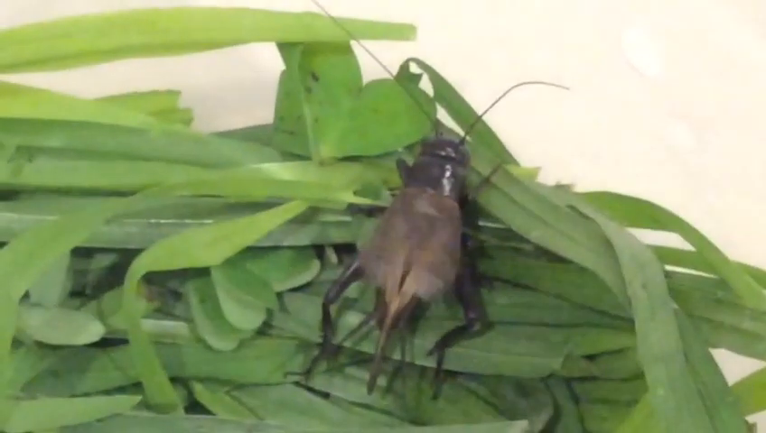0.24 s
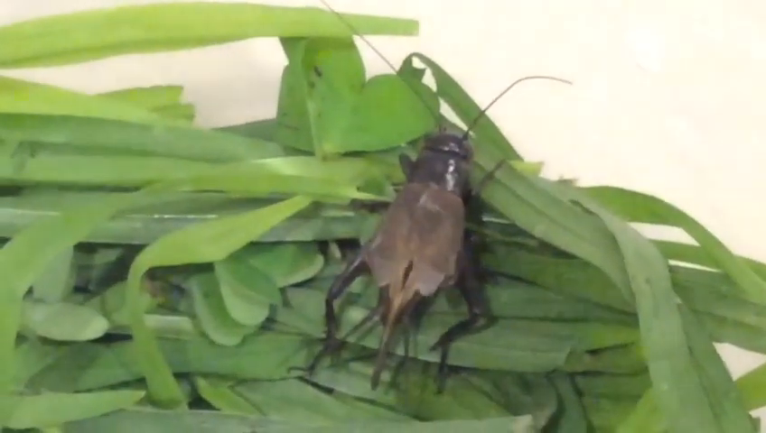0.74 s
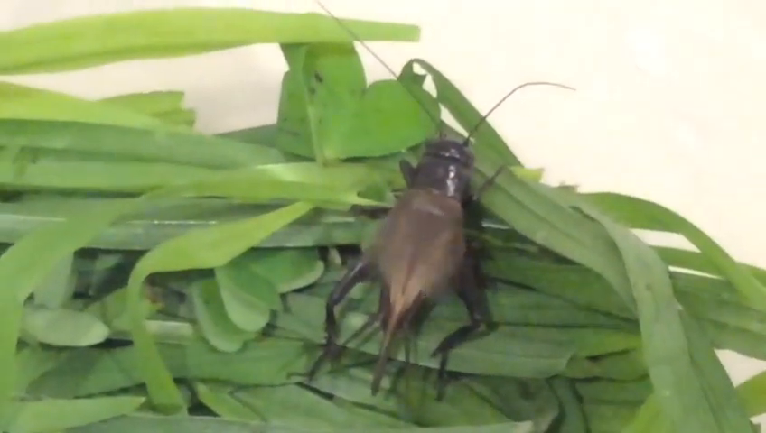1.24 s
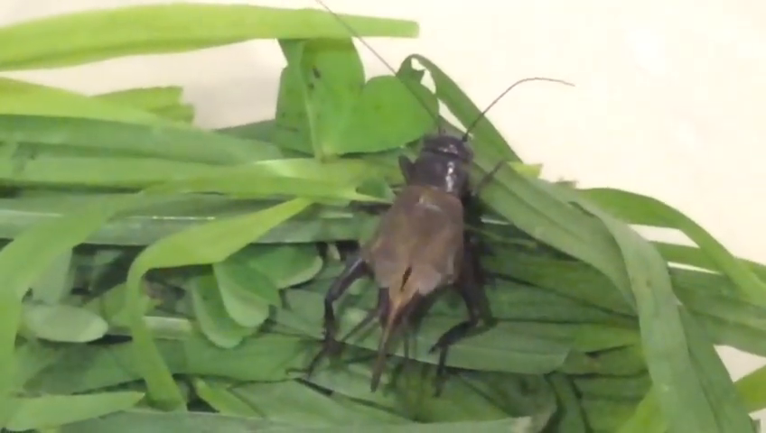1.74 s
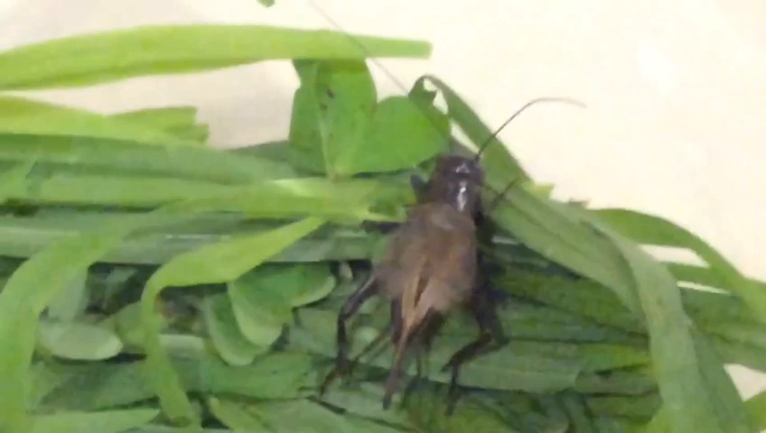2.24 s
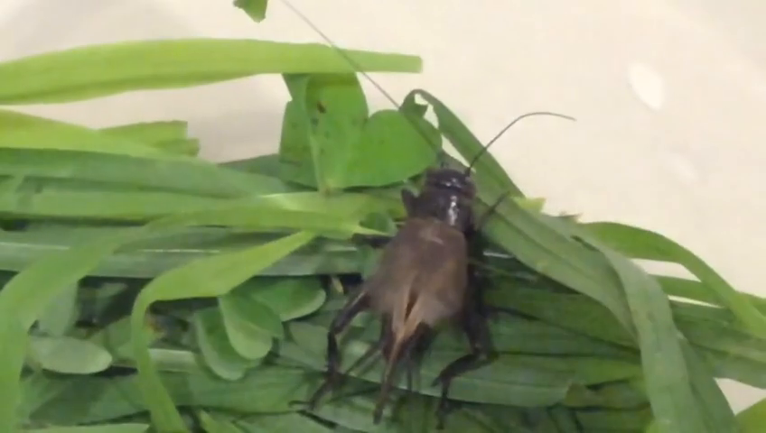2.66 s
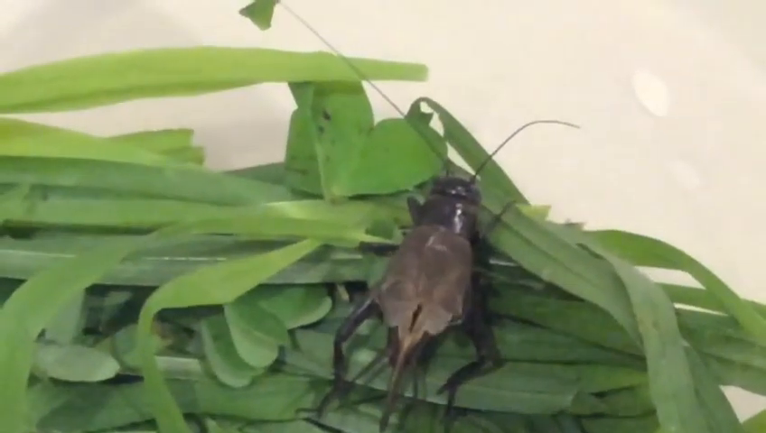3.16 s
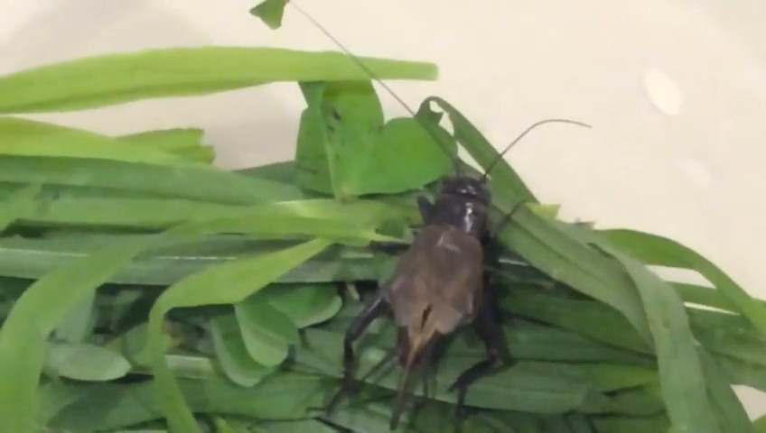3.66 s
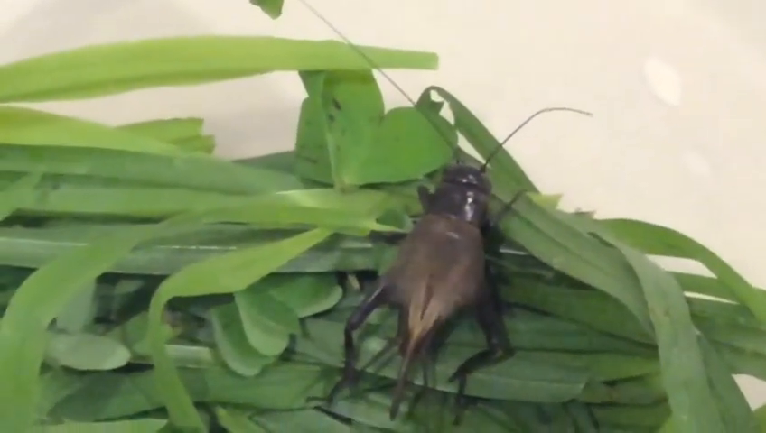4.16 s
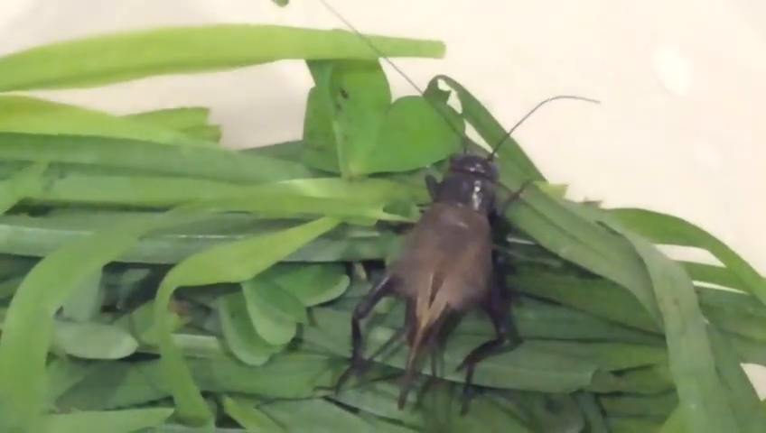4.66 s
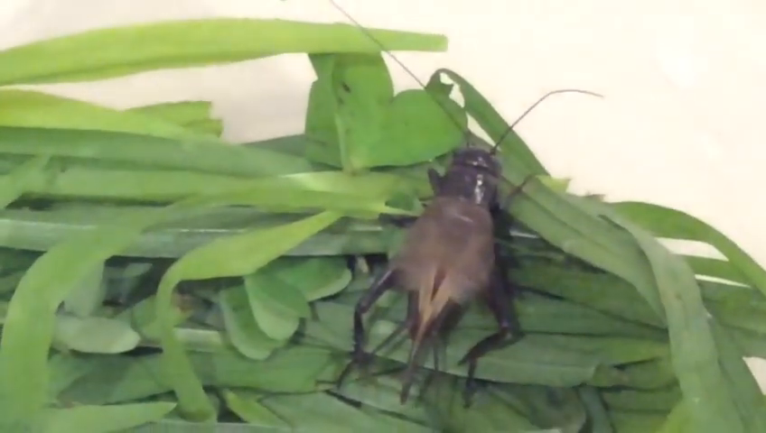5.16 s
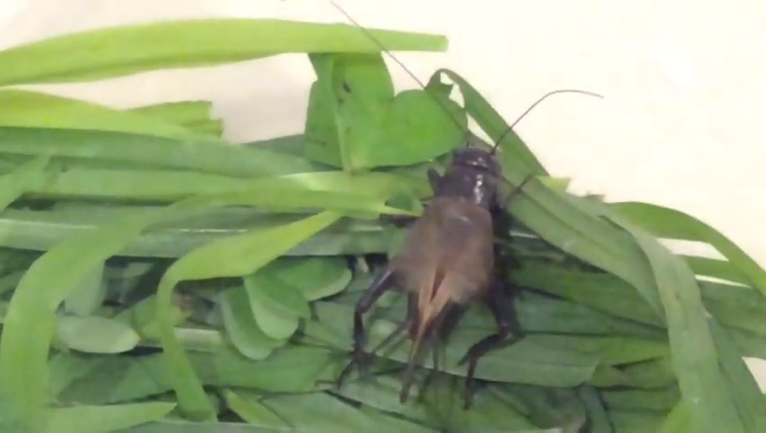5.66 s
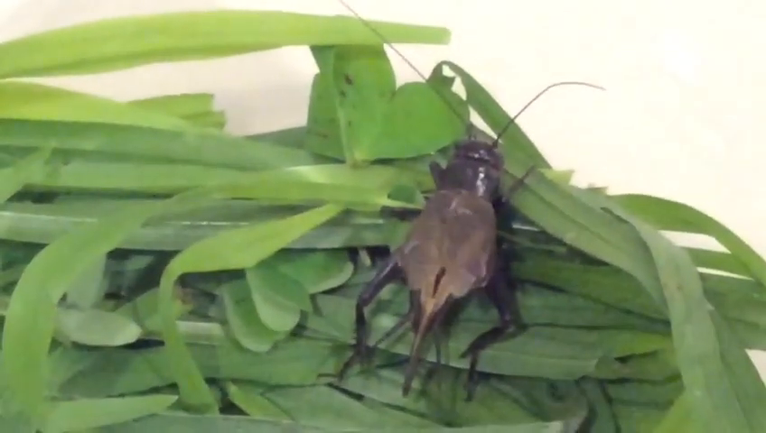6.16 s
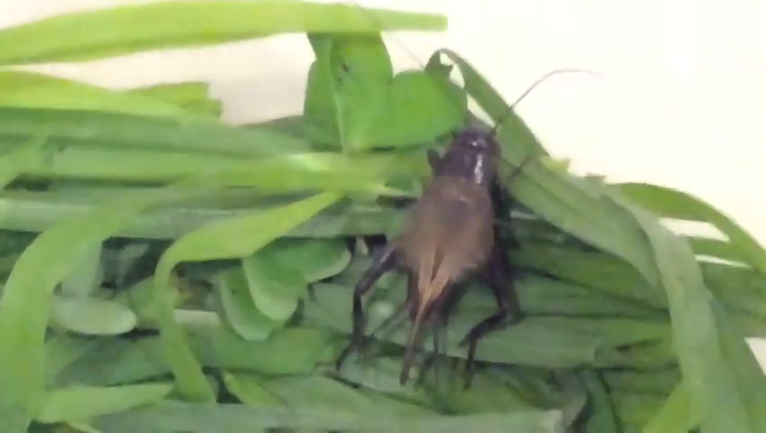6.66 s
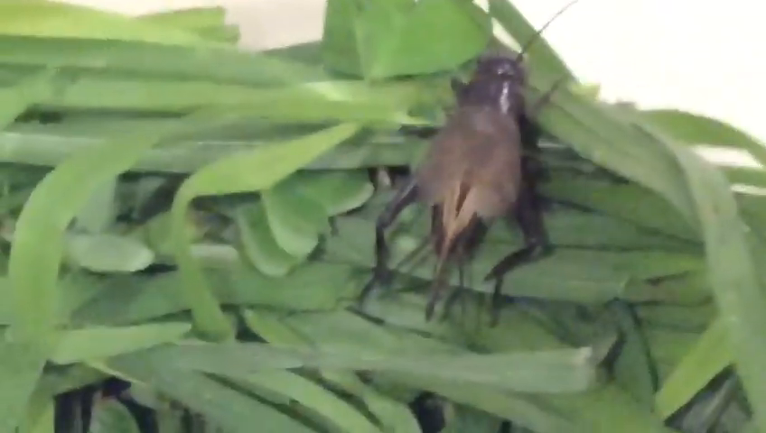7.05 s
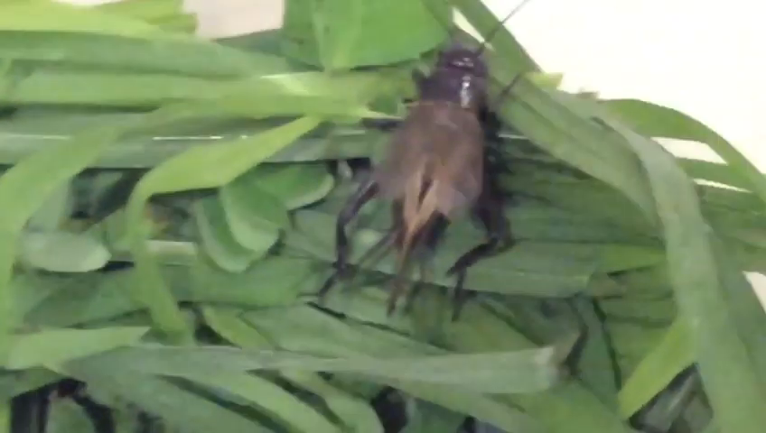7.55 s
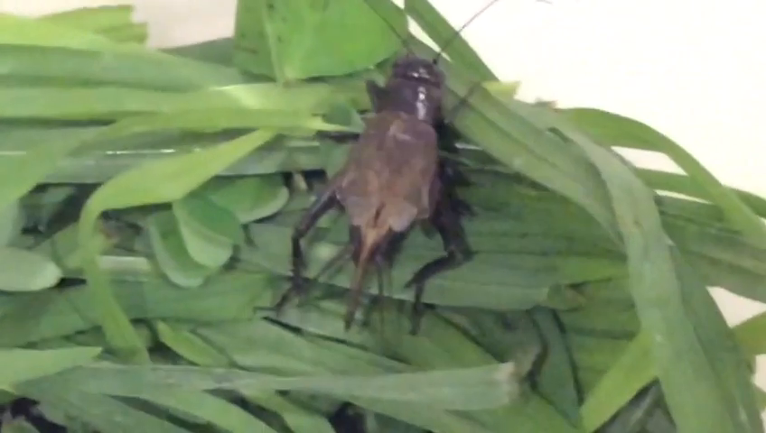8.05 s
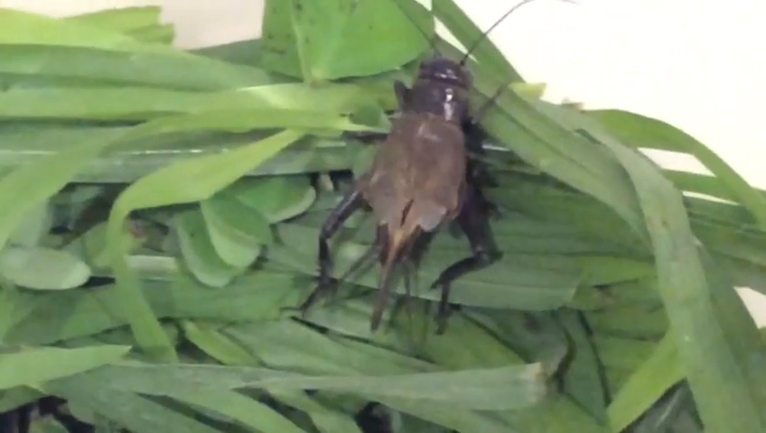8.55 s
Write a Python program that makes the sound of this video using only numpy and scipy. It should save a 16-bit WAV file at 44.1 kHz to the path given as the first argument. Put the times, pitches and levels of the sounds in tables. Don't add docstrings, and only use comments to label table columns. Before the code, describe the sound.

A single cricket sings at close range in a quiet room. Rapid, clear, high pulses, each with a slight downward sag and a trace of dry rasp, gather into short trills separated by brief gaps. A faint low hum and a short room tail sit behind. Around seven seconds the hand-held microphone moves in, the chirping gets louder, and soft bumps and a low creak of the grip are heard.

```python
import sys
import numpy as np
from scipy import signal
from scipy.fft import rfft, irfft
from scipy.io import wavfile

SR = 44100
rng = np.random.default_rng(int(sys.argv[2]) if len(sys.argv) > 2 else 0)


def to_linear_factor(level_db):
    exponent = np.asarray(level_db, float) / 20
    return 10 ** exponent


def dump(signal):
    limited = np.clip(np.atleast_2d(signal).T, -1, 1)
    pcm = np.round(limited * 32767).astype(np.int16)
    wavfile.write(sys.argv[1], SR, pcm)


N = 388521

# pitch_hz, width_hz, level_db
WING_MODES = [(3400, 760, -4.5), (3450.4, 77, 6)]
# time_s, level_db
UPPER_LEVEL = [(0, -7), (1.3, 11.5), (4.3, 14), (6.7, 9), (7.2, -18)]
# pitch_hz, level_db
OVERTONE_RADIATION = [(6000, -42), (6700, -4), (7300, -4), (7700, -21), (9600, -31), (10300, -17),
                      (11000, -10), (11500, 6)]
# pitch_hz, level_db_per_hz
RASP_COLOUR = [(900, -45), (1500, -18), (2500, -11.5), (3400, 17), (3800, -2.5), (4250, 7.5), (4900, -3.5),
               (5900, -11.5), (7200, -8), (9500, -13.5), (11000, -16), (12300, -9)]
# start_s, click_peak_db, settled_tooth_rate_hz, grit_db
TRILL_STARTS = [(-.25, -60, 3530, 0), (0.2578, -56, 3460, 0), (0.807, -54.5, 3555, -1),
                (1.926, -54, 3520, 0), (2.597, -49.5, 3540, 0), (3.246, -53.5, 3520, -1),
                (3.8627, -52.5, 3545, 1), (4.9651, -51, 3530, 0), (5.6475, -48, 3540, 0),
                (6.308, -52.5, 3560, 3), (7.0554, -57, 3545, 0), (8.222, -53, 3500, .5)]
# first_s, last_s, count, length_ms, settled_peak_db
WIDE_STROKES = [(.2744, .2744, 1, 26, -19), (.327, .327, 1, 26.5, -22.5), (.394, .394, 1, 27, -21.5),
                (.455, .512, 2, 26, -19.5), (.5737, .5737, 1, 20, -25), (.8241, .897, 2, 30, -18),
                (.972, 1.425, 7, 37, -19.5), (3.8877, 3.8877, 1, 21.8, -23), (3.958, 3.958, 1, 29, -18),
                (4.0315, 4.255, 4, 36, -21), (4.3343, 4.4758, 3, 34.5, -22), (6.604, 6.706, 3, 24.2, -17.5),
                (6.7695, 6.7695, 1, 25.8, -16), (7.0729, 7.0729, 1, 29.5, -14.5),
                (7.1466, 7.1466, 1, 30.5, -12), (7.2273, 7.2273, 1, 30.6, -12.2),
                (7.2998, 7.2998, 1, 37, -14), (7.3821, 7.528, 3, 28.4, -15.5), (7.602, 7.6796, 2, 32, -15)]
# first_s, last_s, count, length_ms, settled_peak_db
NARROW_STROKES = [(-.23, -.14, 3, 25, -24), (1.4876, 1.6692, 5, 24.6, -19.5),
                  (1.9418, 2.0775, 4, 24.5, -20.5), (2.1175, 2.2504, 4, 25, -21),
                  (2.3052, 2.3052, 1, 24.4, -20.5), (2.6125, 2.658, 2, 23, -24.5),
                  (2.7024, 2.927, 6, 24.5, -21.3), (3.2632, 3.538, 7, 24.3, -22),
                  (4.5448, 4.7634, 6, 23.5, -21), (4.982, 5.342, 9, 24.4, -21.5),
                  (5.662, 5.8025, 4, 25.4, -21.5), (5.845, 5.979, 4, 23.7, -20.3),
                  (6.0263, 6.0263, 1, 15.2, -26), (6.328, 6.553, 6, 22, -20.5),
                  (7.7495, 7.84, 3, 22.5, -14), (8.2373, 8.2373, 1, 26.5, -18.5),
                  (8.289, 8.4608, 5, 21, -17.2), (8.5017, 8.5017, 1, 25.7, -17)]
# time_s, level_db
ROOM_LEVEL = [(6.6, 0), (7.0, -3)]
# delay_ms, level_db
EARLY_ECHOES = [(2.0, -29), (6.5, -19.5), (10.5, -16.5), (14.0, -28), (19, -18.5), (26, -34)]
# start_s, peak_db, thud_hz, brightness_db
FINGER_BUMPS = [(0.572, -55, 92, 6.5), (0.819, -51, 99, -16), (0.842, -46, 180, -22),
                (0.916, -49.5, 140, -25), (0.952, -52.5, 140, -9), (1.035, -51.5, 95, -18),
                (1.334, -54.5, 153, -25), (1.962, -50.5, 77, -47), (2.024, -44, 139, -22),
                (2.054, -50, 207, -16), (2.08, -45, 137, -18), (2.164, -46.5, 181, -4),
                (2.241, -50, 172, -2), (3.566, -51.5, 274, 4.5), (6.797, -51, 83.4, -33),
                (6.848, -53, 78.1, -48), (6.898, -55, 75.4, -48), (7.08, -47, 159, -47),
                (7.371, -56, 148, 10), (7.754, -44, 124, -9), (7.787, -45, 90, -30), (7.838, -49, 108, -43),
                (8.031, -45, 394, -1), (8.044, -50, 127, -36), (8.08, -48.5, 316, -14),
                (8.492, -44.5, 161, -39), (8.518, -52, 97, -40), (8.536, -47, 264, -29),
                (8.574, -40.5, 116, -55)]
# time_s, slips_per_s, level_db
GRIP_CREAK = [(7.08, 88.3, -43), (7.118, 90.9, -56.5), (7.192, 110, -55), (7.248, 110, -55.5),
              (7.286, 97.8, -60), (7.326, 102, -64), (7.368, 90.3, -49.5), (7.43, 101, -56)]
# time_s, level_db
HUM_LEVEL = [(0.0, -62.5), (2.77, -63), (4.66, -62.3), (6.53, -62.5), (7.26, -59), (7.75, -60), (8.24, -62),
             (8.81, -60)]
# pitch_hz, level_db_per_hz
AIR_COLOUR = [(15, -23), (25, -8), (107, -8), (142, -6.5), (199, -13), (316, -17), (400, -23.5),
              (455, -25.5), (1350, -35), (3430, -29.5), (10400, -39), (12200, -25.5), (15900, -88),
              (22000, -120)]

LEAD_S = .3
END_HZ, TOP_AT = 3150, 0.27
QUICK_GAP_MS, WIDEST_GAP_MS = 45, 76
SPEED_HZ_PER_MS, STALL_HZ_PER_MS, RASP_DB_PER_MS = 5.4, 1.3, -.2
COLD_HZ, COLD_STROKES, COLD_EARLY_MS = 285, .9, 3
COLD_DB, COLD_DB_STROKES, TIRE_DB, TIRE_HZ, LAST_DB = -5, 1.4, -.15, -3, -1.5
OVERTONE_DB, COLD_OVERTONE_DB = -52, 3
SCRAPE_DB, COLD_SCRAPE_DB = -52.5, -3
UPPER_HZ, UPPER_WIDTH_HZ = 3730, 165
NULL_HZ, NULL_WIDTH_HZ, NULL_DEPTH = 3615, 60, .9
SIDE_HZ, SIDE_WIDTH_HZ, SIDE_MS, SIDE_DB = 3660, 191, 15, 6
SPLASH_HZ, SPLASH_WIDTH_HZ, SPLASH_DB = 4200, 420, -5
ROOM_T60_S, ROOM_DB = 0.57, -16.5
MOTOR_HZ, MOTOR_WIDTH_HZ, MOTOR_DB = 137, 12, -69


def rms_one(x):
    return x / np.sqrt(np.mean(x ** 2) + 1e-20)


def at_hz(points, hz):
    points = np.array(points)
    return np.interp(np.log(hz), np.log(points[:, 0]), points[:, 1])


def coloured(x, spectrum):
    hz = np.arange(len(x) // 2 + 1) * SR / len(x) + 1
    return rms_one(irfft(rfft(x) * to_linear_factor(at_hz(spectrum, hz)), len(x)))


def resonance(x, hz, width_hz):
    r = np.exp(-np.pi * width_hz / SR)
    top = np.array([1, 0, -1]) * (1 - r * r) / 2
    bottom = [1, -2 * r * np.cos(2 * np.pi * hz / SR), r * r]
    return signal.lfilter(top, bottom, x + 1e-18)


def steep_resonance(x, hz, width_hz):
    return resonance(resonance(x, hz, width_hz), hz, width_hz)


def wander(size, rate_hz):
    knots = rng.standard_normal(size // 8 + 2)
    return np.interp(np.arange(size) * rate_hz / SR, np.arange(len(knots)), knots)


def level_at(points, s):
    return to_linear_factor(np.interp(s, *np.transpose(points)))


def add(out, s, piece):
    i = round(s * SR)
    out[i:i + len(piece)] += piece[:len(out) - i]


def strokes():
    song = []
    for first, last, count, length_ms, peak_db in WIDE_STROKES + NARROW_STROKES:
        song += [(s, length_ms, peak_db) for s in np.linspace(first, last, round(count))]
    s, ms, db = np.transpose(sorted(song))
    opened, _, hz, grit_db = np.transpose(TRILL_STARTS)
    trill = np.searchsorted(opened, s) - 1
    place = np.arange(len(s)) - np.searchsorted(s, opened)[trill]
    is_last = np.diff(trill, append=99) > 0
    wind_up = np.minimum(1000 * np.diff(s, prepend=-1), WIDEST_GAP_MS) - QUICK_GAP_MS
    cold = np.exp(-place / COLD_STROKES)
    weak = np.exp(-place / COLD_DB_STROKES)
    early_ms = COLD_EARLY_MS * cold
    chance = rng.standard_normal((len(s), 4)) * [15, .5, 2, 1.5]

    top_hz = hz[trill] + SPEED_HZ_PER_MS * wind_up - COLD_HZ * cold + TIRE_HZ * place + chance[:, 0]
    end_hz = END_HZ + STALL_HZ_PER_MS * wind_up
    peak_db = db + COLD_DB * weak + TIRE_DB * place + LAST_DB * is_last + chance[:, 1]
    overtone_db = OVERTONE_DB + grit_db[trill] + COLD_OVERTONE_DB * weak + chance[:, 2]
    cleaner_db = RASP_DB_PER_MS * np.minimum(wind_up, np.roll(wind_up, -1)) * (place > 0)
    scrape_db = SCRAPE_DB + grit_db[trill] + cleaner_db + COLD_SCRAPE_DB * cold + chance[:, 3]
    return np.transpose([s - early_ms / 1000, ms + early_ms, top_hz, end_hz, peak_db, overtone_db, scrape_db])


def stroke(s, ms, top_hz, end_hz, peak_db, overtone_db):
    size = 3072
    share = np.arange(size) / (ms / 1000 * SR) - .05
    rising = 110 * np.clip(1 - share / TOP_AT, 0, 2) ** 2
    sagging = (top_hz + 30 - end_hz) * np.clip((share - TOP_AT) / (1 - TOP_AT), 0, 1.3) ** 1.903
    uneven_teeth = 14 * wander(size, 389)
    rate = top_hz + 30 - rising - sagging + uneven_teeth
    phase = 2 * np.pi * (np.cumsum(rate) / SR + rng.random())
    contact = np.clip((share + .05) / .15, 0, 1) * np.clip((1.06 - share) / .09, 0, 1)
    swell = to_linear_factor(19.3 * np.minimum(share, 1) + 1.1 * wander(size, 297.3))
    drive = contact * swell * np.sin(phase)

    tone = sum(to_linear_factor(db) * resonance(drive, hz, width_hz) for hz, width_hz, db in WING_MODES)
    tone = tone + level_at(UPPER_LEVEL, s) * resonance(drive, UPPER_HZ, UPPER_WIDTH_HZ)
    near_null = np.exp(-((rate - NULL_HZ) / NULL_WIDTH_HZ) ** 2)
    tone = tone * (1 - NULL_DEPTH * np.clip(5 * (share - TOP_AT), 0, 1) * near_null)
    sideways = np.roll(steep_resonance(drive, SIDE_HZ, SIDE_WIDTH_HZ), round(SIDE_MS / 1000 * SR))
    side_db = SIDE_DB + 1.5 * np.interp(s, *np.transpose(ROOM_LEVEL))
    tone = tone + to_linear_factor(side_db) * sideways

    catch = to_linear_factor(-7 + .08 * (top_hz - 3700)) * np.exp(-((share - .16) / .08) ** 2) * rng.standard_normal(size)
    splash_gain = to_linear_factor(SPLASH_DB + 4 * rng.standard_normal())
    splash = splash_gain * steep_resonance(catch, SPLASH_HZ, SPLASH_WIDTH_HZ)
    tone = tone + np.abs(tone).max() * (steep_resonance(catch, 3370, 330) + splash)

    fading_db = overtone_db + 7 - 6 * np.minimum(share, 1) + 3 * wander(size, 200)
    fading = contact * np.clip(share / .25 + .2, 0, 1) * to_linear_factor(fading_db)
    overtones = sum(to_linear_factor(at_hz(OVERTONE_RADIATION, k * rate)) * np.sin(k * phase) for k in (2, 3))
    return to_linear_factor(peak_db) * tone / np.abs(tone).max() + fading * overtones


def rasp(size, song):
    gate = np.zeros(size)
    moments = [0, .3, .55, .95, 1.15, 1.5, 1.85, 2]
    pressure = [0, 0.45, 0.54, 0.85, 0.36, 0.33, 0.25, 0]
    for s, ms, *_, scrape_db in song:
        share = np.arange(round(2 * ms / 1000 * SR)) / (ms / 1000 * SR)
        add(gate, s + LEAD_S - .004, to_linear_factor(scrape_db + 10.5) * np.interp(share, moments, pressure))
    grains = to_linear_factor(1.85 * np.minimum(rng.exponential(1, size), 5))
    grit = coloured(rng.standard_normal(size) * grains, RASP_COLOUR)
    edges = [700, 2600, 3850, 4700, 6000, 8000, 10000, 13000]
    patchy = np.zeros(size)
    for k, pair in enumerate(zip(edges, edges[1:])):
        band = signal.sosfilt(signal.butter(2, pair, "band", fs=SR, output="sos"), grit)
        patchy += to_linear_factor(3.8 * wander(size, 45)) * band * (-1) ** k
    return gate * to_linear_factor(2.5 * wander(size, 300)) * patchy


def lifts(size):
    out = np.zeros(size)
    for s, db, _, _ in TRILL_STARTS:
        brush = rng.standard_normal(1200) * np.exp(-np.arange(1200) / (0.007 * SR))
        add(out, s + LEAD_S, to_linear_factor(db + 18) * (steep_resonance(brush, 3200, 560) + to_linear_factor(-34) * brush))
    return out


def room(x):
    t = np.arange(SR) / SR
    echo = rng.standard_normal(SR) * to_linear_factor(-60 * t / ROOM_T60_S) * np.clip(t / 0.044, 0, 1)
    echo = to_linear_factor(ROOM_DB) * echo / np.linalg.norm(echo)
    echo = echo + to_linear_factor(2) * resonance(echo, 3550, 180) - 0.93 * resonance(echo, 3760, 300)
    for ms, db in EARLY_ECHOES:
        add(echo, ms / 1000, to_linear_factor(db) * np.ones(1))
    return signal.fftconvolve(x, echo)[:len(x)]


def bumps():
    out = np.zeros(N)
    t = np.arange(4000) / SR
    for s, db, hz, bright_db in FINGER_BUMPS:
        thud = np.sin(2 * np.pi * hz * t) * np.exp(-t * hz / 0.91) * (1 - np.exp(-t * hz / 0.18)) ** 2
        puff = resonance(rng.standard_normal(len(t)), 220, 267) * np.exp(-t / 0.015)
        tick = resonance(rng.standard_normal(len(t)), 1000, 1200) * np.exp(-t / 0.015)
        add(out, s, to_linear_factor(db) * (3.52 * thud + 1.78 * puff + to_linear_factor(bright_db - 3.5) * tick))
    return out


def creak():
    s, per_s, db = np.transpose(GRIP_CREAK)
    t = np.arange(s[0], s[-1], 1 / SR)
    turns = np.cumsum(np.interp(t, s, per_s) * (1 + .05 * wander(len(t), 58.4))) / SR
    slips = np.diff(np.floor(turns), prepend=0) * to_linear_factor(2.7 * wander(len(t), 98.8))
    body = resonance(slips, 118, 49) - to_linear_factor(-18) * resonance(slips, 450, 260)
    out = np.zeros(N)
    add(out, s[0], rms_one(body) * to_linear_factor(np.interp(t, s, db)) * signal.windows.tukey(len(t), .15))
    return out


def hum():
    motor = steep_resonance(rng.standard_normal(N), MOTOR_HZ, MOTOR_WIDTH_HZ)
    loudness = level_at(HUM_LEVEL, np.arange(N) / SR) * to_linear_factor(2.0 * wander(N, 9))
    air = loudness * coloured(rng.standard_normal(N), AIR_COLOUR)
    air = signal.sosfilt(signal.butter(10, 11250, fs=SR, output="sos"), air)
    return air + to_linear_factor(MOTOR_DB) * rms_one(motor)


def scene():
    size, song = N + round(LEAD_S * SR), strokes()
    cricket = rasp(size, song) + lifts(size)
    for s, *motion, _ in song:
        add(cricket, s + LEAD_S, stroke(s, *motion))
    answer = level_at(ROOM_LEVEL, np.arange(N) / SR) * room(cricket)[-N:]
    mix = cricket[-N:] + answer + bumps() + creak() + hum()
    return mix[None]


def low_pass(x):
    return signal.sosfilt(signal.butter(12, 12350, fs=SR, output="sos"), x)


def record(dry):
    top_cut = signal.cheby2(12, 60, 12900, fs=SR, output="sos")
    bass_cut = signal.butter(4, 38, "high", fs=SR, output="sos")
    mix = signal.sosfilt(np.vstack([top_cut, bass_cut]), dry)
    return low_pass(mix)


dry = scene()
out = record(dry)
dump(out)
```